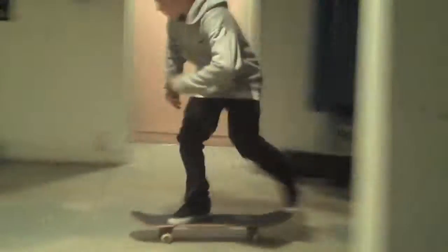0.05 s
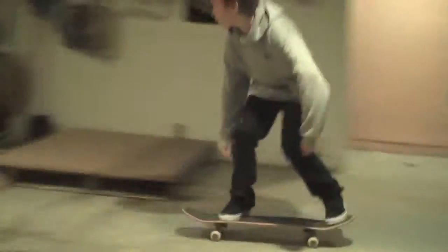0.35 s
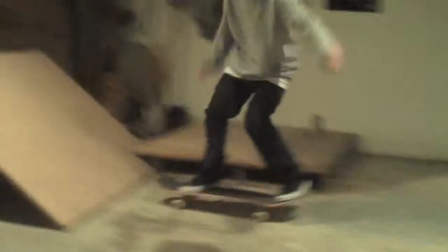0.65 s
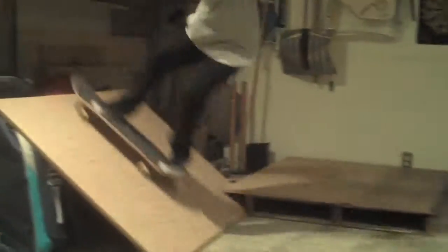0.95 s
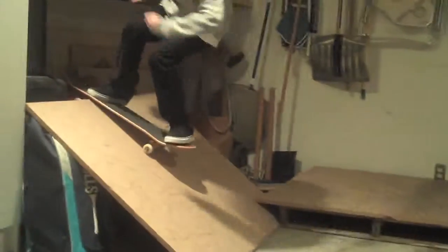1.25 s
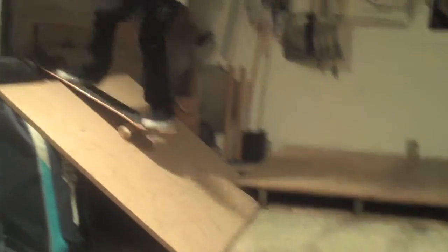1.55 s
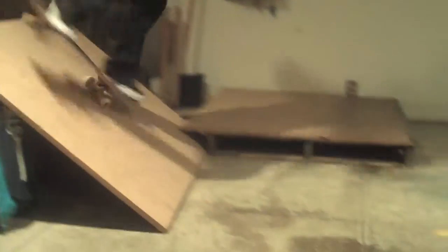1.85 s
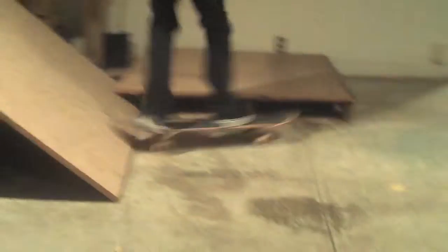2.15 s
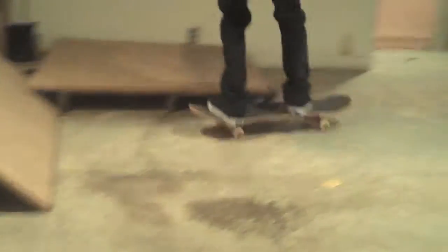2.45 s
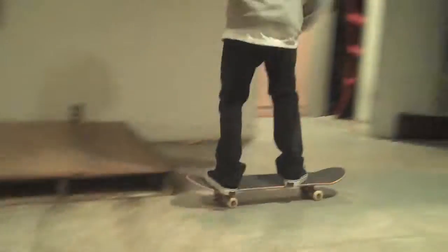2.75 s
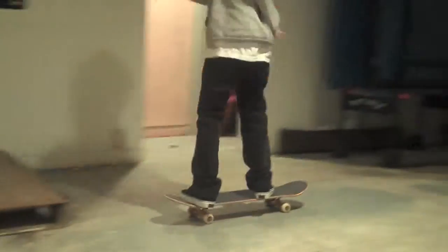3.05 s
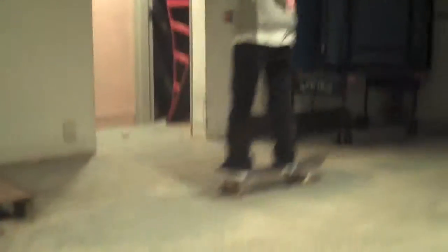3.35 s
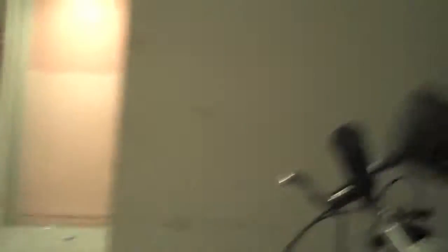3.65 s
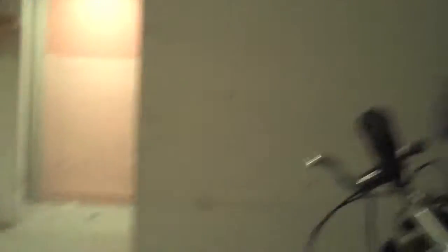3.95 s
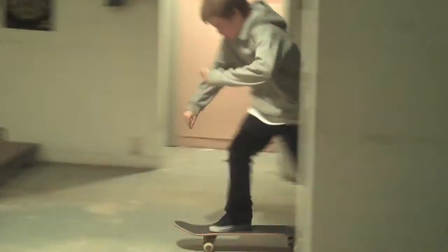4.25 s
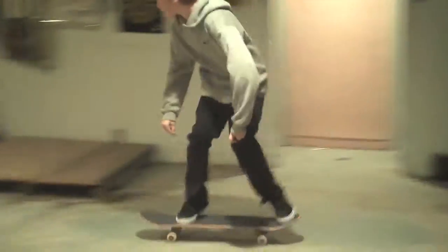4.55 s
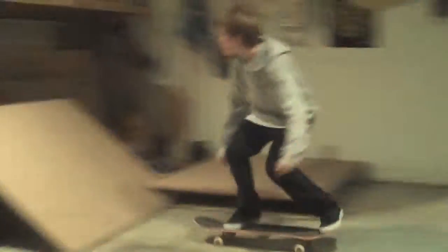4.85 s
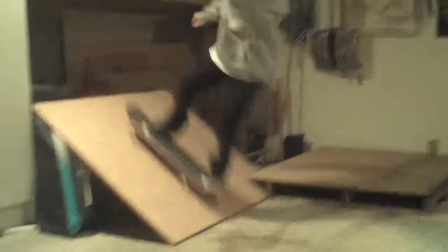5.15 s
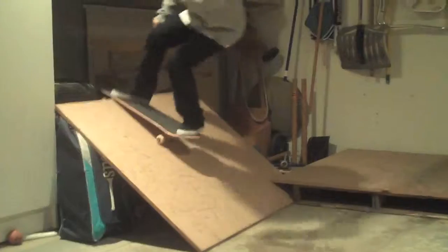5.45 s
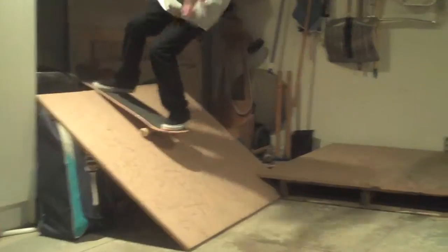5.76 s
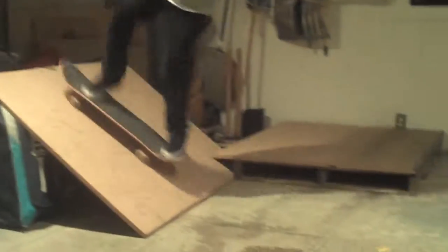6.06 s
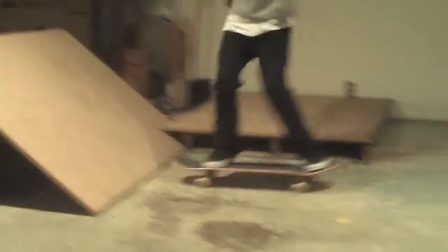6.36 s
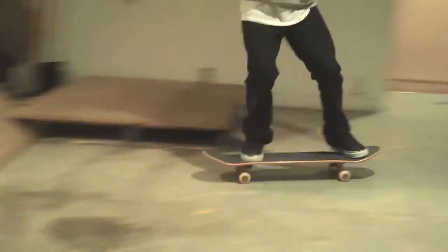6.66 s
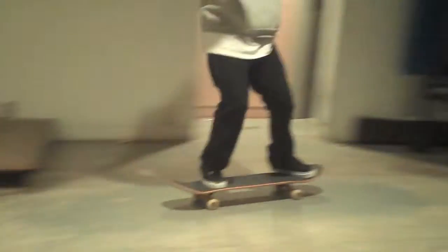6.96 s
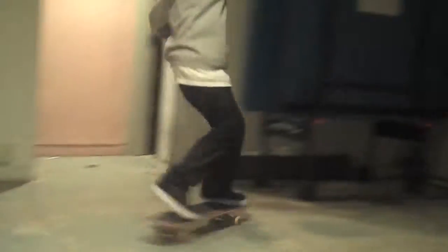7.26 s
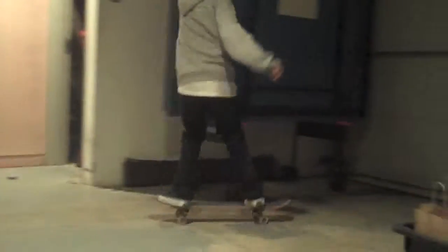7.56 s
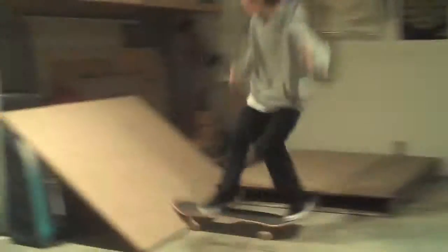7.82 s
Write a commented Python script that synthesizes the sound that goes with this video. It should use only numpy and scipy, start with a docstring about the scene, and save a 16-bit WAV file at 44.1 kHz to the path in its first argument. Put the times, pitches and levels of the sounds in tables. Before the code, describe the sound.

A skateboard rolls over gritty concrete and clatters up and down a wooden ramp, with sharp knocks echoing in a garage.

```python
"""Skateboard on a garage ramp

A bare concrete garage, one small microphone in a fixed spot. A skater rolls up a plywood ramp, stalls,
drops back and coasts away, does it again and starts a third run. Hard wheels roar on the gritty floor;
each blow rings the ramp, the deck and the metal trucks. Knocks are drier close by and roomier far off.
The garage rings on after each one, and the loudest overload the microphone."""
import sys
import numpy as np
from scipy import signal
from scipy.io import wavfile
from scipy.ndimage import uniform_filter1d

SR = 44100
rng = np.random.default_rng(int(sys.argv[2]) if len(sys.argv) > 2 else 0)


def output_pcm(signal):
    """Save a mono or channel-first signal as 16-bit PCM at the path in sys.argv[1].

    Samples are clipped to [-1, 1] before scaling.
    """
    pcm = np.clip(np.atleast_2d(signal).T, -1, 1) * 32767
    wavfile.write(sys.argv[1], SR, np.round(pcm).astype(np.int16))


N = 356769
FFT_SIZE = 8192
HZ, TIME = np.fft.rfftfreq(FFT_SIZE, 1 / SR), np.arange(N) / SR


def amp(db):
    """Decibels to gain."""
    return 10 ** (np.asarray(db) / 20)


def unit_rms(x):
    """Scales to rms 1."""
    return x / np.sqrt(np.mean(x ** 2) + 1e-20)


def curve_at(points, hz):
    """Reads a table on a log-frequency axis."""
    freqs, values = np.transpose(points)
    return np.interp(np.log(hz + 1), np.log(freqs + 1), values)


def since(start_s):
    """Seconds gone by after a moment, zero before it."""
    return np.maximum(TIME - start_s, 0)


def add(mix, start_s, sound):
    """Mixes a sound in at a time."""
    part = mix[max(round(start_s * SR), 0):][:len(sound)]
    part += sound[:len(part)]


def body(spectrum, modes=()):
    """Frequency response of unit power: a broad spectrum with resonance peaks on it."""
    peaks = sum((amp(db) ** 2 - 1) / (1 + (2 * (HZ - hz) / width) ** 2) for hz, width, db in modes)
    return unit_rms(amp(curve_at(spectrum, HZ)) * np.sqrt(np.maximum(1 + peaks, .1)))


def ring(x, response):
    """Passes x through the minimum-phase filter that has this response."""
    log_gain = np.log(np.maximum(response, 1e-5))
    mirrored = np.concatenate([log_gain, log_gain[-2:0:-1]])
    impulse = np.fft.ifft(np.exp(np.conj(signal.hilbert(mirrored)))).real
    return signal.oaconvolve(x, impulse[:FFT_SIZE // 2])[:len(x)]


def floor_grain(per_s, spread_db, wet_db=2, echo_s=0.049):
    """Random clicks of a wheel on rough concrete, a few much larger, and their wash in the room."""
    sizes = amp(spread_db * np.minimum(rng.exponential(1, N), 5))
    clicks = sizes * rng.choice([-1, 1], N) * (rng.random(N) < per_s / SR)
    room_energy = signal.lfilter([1], [1, -np.exp(-1 / (echo_s * SR))], clicks ** 2)
    wash = np.sqrt(room_energy) * rng.standard_normal(N)
    return unit_rms(clicks) + amp(wet_db) * unit_rms(wash)


def standing_waves(x, depth_db=3.5, frames=12, bins=3):
    """Narrow peaks come and go as the board moves through the standing waves of the room."""
    spectra = signal.stft(x, nperseg=2048, noverlap=1536)[2]
    drift = uniform_filter1d(rng.standard_normal(spectra.shape), frames, axis=1)
    patches = unit_rms(uniform_filter1d(drift, bins, axis=0))
    return unit_rms(signal.istft(spectra * amp(depth_db * patches), nperseg=2048, noverlap=1536)[1][:N])


def stretch(start_s, end_s, level_db, tone_db, change_db=0, rise_s=0.063, release_s=0.061):
    """Gains of rumble, roar and grit over one part of a ride: rise, hold, die away in the room."""
    envelope = np.minimum(since(start_s) / rise_s, 1) * np.exp(-since(end_s) / release_s)
    return envelope * amp(level_db + np.array(tone_db)[:, None] + change_db)


def run_up(start_s, ramp_s, floor_db, ramp_db, rumble_db, settle_s=.22, approach_s=0.15):
    """The wheels settle, grow louder towards the ramp, then slow to a stall on the smooth plywood."""
    # wheel tone on floor and ramp, swells at set-down and near the ramp: rumble_db, roar_db, grit_db
    cruise_db = [-15, -2.5, -11]
    climb_db = [-12, -5, -24]
    set_down_db = [-9.5, 6, 2]
    approach_db = [14, 10, 11.5]
    climb_s, stall_s, speed_power = 0.95, .85, 2.39
    creep = 0.25  # share of its speed the board keeps while the rider balances at the top
    settling = np.exp(-(since(start_s) / settle_s) ** 2)
    closeness = np.exp(-(np.maximum(ramp_s - TIME, 0) / approach_s) ** 2)
    swell_db = np.outer(set_down_db, settling) + np.outer(approach_db, closeness)
    swell_db[0] += rumble_db
    speed = np.maximum(1 - since(ramp_s) / climb_s, creep)  # gravity slows the board
    return [stretch(start_s, ramp_s, floor_db, cruise_db, swell_db),
            stretch(ramp_s, ramp_s + stall_s, ramp_db, climb_db) * speed ** speed_power]


def roll_back(start_s, floor_s, end_s, ramp_db, floor_db, rumble_db, grit_db, jolt_s=0.29):
    """The board rolls quietly down, lands with a jolt and coasts away."""
    # wheel tone on ramp and floor, and the swell while the board shakes: rumble_db, roar_db, grit_db
    descent_db = [-7.5, -3.5, -8]
    coast_db = [-9.5, -3, -7.5]
    jolt_db = [23.5, 28, 4]
    colour_db = np.array([[rumble_db], [0], [grit_db]])
    shake_db = np.outer(jolt_db, np.exp(-since(floor_s) / jolt_s))
    return [stretch(start_s, floor_s, ramp_db, descent_db, colour_db),
            stretch(floor_s, end_s, floor_db, coast_db, colour_db + shake_db)]


def turn(start_s, end_s, rise_s, level_db):
    """Wheels dragged sideways hiss with grit and fade as the turn slows."""
    # tone of the scrape: rumble_db, roar_db, grit_db
    scrape_db = [-23, -1, 1.5]
    # its fade: rumble_db_per_s, roar_db_per_s, grit_db_per_s
    fade_rates = [10, 26.5, 14.5]
    return [stretch(start_s, end_s, level_db, scrape_db, -np.outer(fade_rates, since(start_s)), rise_s)]


def rolling(spin_hz=17, throb_db=0.1):
    """Floor grain shakes deck and wheels; slightly uneven wheels throb as they turn."""
    # across the floor and up the ramp: start_s, ramp_s, floor_db, ramp_db, rumble_db
    run_ups = [(0.0, 0.795, -33, -18.5, 2), (4.255, 5.06, -28.5, -24.5, -2.5), (7.77, 7.859, -42, -19, 6)]
    # back down and away: start_s, floor_s, end_s, ramp_db, floor_db, rumble_db, grit_db
    roll_backs = [(1.65, 2.058, 3.45, -41, -45.5, -0.5, -0.5), (5.803, 6.197, 7.25, -41, -42.5, 1.5, -1)]
    # sideways scrapes: start_s, end_s, rise_s, level_db
    turns = [(1.672, 2.05, 0.034, -47.5), (3.602, 3.8, .05, -54.5), (3.794, 4.204, 0.019, -24),
             (7.244, 7.81, 0.16, -30.5)]
    # low, middle and high layers of the wheel noise: freq_hz, level_db
    rumble_spectrum = [(30, -55), (70, -37), (95, -16), (130, 1), (190, 3), (240, 5), (300, -0.5), (450, 9),
                       (1500, -59.5)]
    roar_spectrum = [(60, -57), (220, -22), (350, -1.5), (600, 2), (800, 2.5), (1050, -1.5), (1650, -6),
                     (1980, -9.5), (2250, -14.5), (2900, -22.5), (6000, -53), (14000, -75)]
    grit_spectrum = [(200, -57), (900, 6), (1500, 11), (2050, 8), (2450, 4.5), (2950, 0.5), (4000, -2.5),
                     (5300, -5.5), (6000, -8.5), (7200, -13), (9600, -16.5), (13500, -28.5)]
    # resonances of the room and of the wheels: pitch_hz, width_hz, boost_db
    room_modes = [(137, 11, 0.5), (187, 13, 8.5), (238.4, 18, 12), (288, 37, 8)]
    wheel_modes = [(326, 25, 2), (384, 32, 1.05), (581, 49, 6.1), (688, 28, 5.4), (794, 49, 5.6),
                   (1370, 110, 0.91), (1600, 82, 3), (1890, 160, 2.2)]
    moves = [(run_up, run_ups), (roll_back, roll_backs), (turn, turns)]
    power = sum(gains ** 2 for move, rows in moves for row in rows for gains in move(*row))
    rumble_gain, roar_gain, grit_gain = np.sqrt(power)
    throb_rates_hz = spin_hz * rng.uniform(0.26, 2.7, 12)
    throb = unit_rms(sum(np.sin(2 * np.pi * (hz * TIME + rng.random())) for hz in throb_rates_hz))
    rumble = unit_rms(ring(floor_grain(per_s=1500, spread_db=8), body(rumble_spectrum, room_modes)))
    roar = standing_waves(ring(floor_grain(per_s=2000, spread_db=2), body(roar_spectrum, wheel_modes)))
    grit = unit_rms(ring(floor_grain(per_s=2000, spread_db=2.5), body(grit_spectrum)))
    return (rumble_gain * rumble + roar_gain * roar + grit_gain * grit) * amp(throb_db * throb)


def strikes():
    """Start, part levels and chatter of each blow: hard ones ring the trucks and tick, heavy ones thud."""
    # blows on the board: start_s, level_db, hardness_db, weight_db, chatter_s
    cracks = [(0.052, -29, -5, -11, 0.092), (0.363, -36.5, 0, 2, .015), (0.552, -38, -13, 15, 0.0035),
              (2.537, -34, 3.5, -8, 0.026), (2.727, -41, 4.5, 3, 0.0088), (2.920, -40.5, 2, 5, 0.012),
              (3.268, -39, 5, 4, 0.012), (6.545, -31, -3, 6, .015)]  # wheels tick over cracks in the floor
    landings = [(0.798, -23, 9.5, -6, 0.061), (0.874, -11, -25.5, -1, 0.0052), (2.060, -7, 5, 5.5, 0.013),
                (2.150, -13.5, -5.5, -8, 0.063), (4.957, -24.5, 4, -11, 0.038),
                (6.056, -13.5, -1.5, 2.5, 0.015), (6.302, -16, 5, -13, 0.022)]  # the rider's weight comes down at the foot of the ramp
    clacks = [(0.835, -13, 1.5, -11, 0.017), (3.396, -26.5, -1.5, 13, 0.0015),
              (3.432, -36.5, 6, -4.5, 0.012), (5.022, -11.5, 3, 3, 0.011), (5.097, -12, 0.5, 1, 0.0092),
              (6.192, -15.5, 3, 8, 0.0079), (7.859, -12, 0, 2.5, 0.04), (7.935, -11.5, -1, 0, 0.0093)]  # trucks clack as the wheels hit the ramp's lip or the floor
    booms = [(1.090, -26.5, 12, -8, 0.0075), (1.122, -19.5, -4, -2, 0.018), (5.138, -13, 1, -4, 0.0057),
             (5.445, -30.5, -0.5, 9, 0.043), (8.056, -20, -22, 16, 0.018)]  # the plywood booms under the load
    shifts = [(1.550, -50, 0.5, -8, 0.0062), (1.660, -44, 7, -8, 0.039), (1.692, -37, 1, 8, 0.039),
              (2.012, -28.5, -2.5, -5, .081), (5.831, -39.5, -2.5, -1, .018), (5.879, -38, -1.5, -10, .013),
              (7.818, -36, 7, -12, .035)]  # trucks knock as the rider shifts weight
    slaps = [(4.204, -13.5, 8, 9, 0.016), (4.235, -9.5, -2.5, -14, 0.016), (4.272, -14, -11, -7, .01)]  # the board slaps onto concrete after a turn
    # share of hardness and of weight that reaches each part: thud, ramp, deck, truck, tick
    hard_shares = np.array([0.034, 0.062, 0.098, 0.62, 1.0])
    heavy_shares = np.array([1.0, 0.16, 0, 0.12, 0.19])

    def shake(rows, parts_db):
        """One kind of blow; parts_db is thud_db, ramp_db, deck_db, truck_db, tick_db."""
        return [(start_s, level_db + hard_db * hard_shares + heavy_db * heavy_shares + parts_db, chatter_s)
                for start_s, level_db, hard_db, heavy_db, chatter_s in rows]

    return (shake(clacks, (-34, -4.5, -9.5, 0, -16))
            + shake(landings, (-27, -3, -0.5, -6.5, -19.5))
            + shake(slaps, (-32, -12.5, 1, -7, -20))
            + shake(booms, (-23, 1, -20.5, -9, -33))
            + shake(cracks, (-43, -5.5, -2, -9.5, -17))
            + shake(shifts, (-24, 1.5, -7.5, -2.5, -11)))


def rattle(t, chatter_s, early_s=0.011, attack_share=0.1, spiky_db=2.5, clack_s=0.00088):
    """Loose hardware chatters in uneven clacks; a longer chatter starts more softly."""
    clacks = unit_rms(uniform_filter1d(rng.standard_normal(len(t)), int(clack_s * SR)))
    envelope = np.exp(-t / (early_s + chatter_s)) * (1 - np.exp(-t / (attack_share * chatter_s)))
    return unit_rms(rng.standard_normal(len(t)) * amp(spiky_db * np.clip(clacks, -2, 2)) * envelope)


def wall_echoes():
    """One second of dense echoes off bare walls, each band dying at its own speed."""
    # reverberation of the garage: freq_hz, t60_s
    decay_times = [(60, 0.17), (130, 0.32), (250, 0.57), (800, 0.59), (2200, 0.57), (5500, 0.75),
                   (9000, 0.45), (14000, 0.21)]
    hz, t, spectra = signal.stft(rng.standard_normal(SR), SR, nperseg=256)
    decay = amp(-60 * t / curve_at(decay_times, hz)[:, None])
    return signal.istft(spectra * decay, SR, nperseg=256)[1][:SR]


def blows(build_s=0.0032, energy_s=0.025, click_db=-13, soften_s=0.025, shelf_hz=7500):
    """Each blow is a contact click, a rattle and the room's tail, coloured by the parts it shakes."""
    # what each part radiates: freq_hz, level_db
    thud = [(15, -24), (35, -10), (70, -5), (110, 1.5), (170, 5), (500, -51.5), (3000, -81)]
    ramp = [(30, -48), (60, -52), (105, -22.5), (150, -19.5), (200, -3.5), (400, 1.5), (620, 2.5),
            (1000, -2.5), (2000, -8), (4000, -36.5), (12000, -44)]
    deck = [(30, -43), (130, -40.5), (300, -35), (500, -3.5), (720, 3), (1050, -1), (1400, -0.5),
            (2000, -12), (4000, -52.5), (12000, -62)]
    truck = [(30, -23), (300, -40), (900, -5.5), (1700, -4), (2300, -4), (3100, -7.5), (4500, -22.5),
             (7000, -37.5), (14000, -89)]
    tick = [(30, -37), (1500, -29), (3500, 4.5), (5300, -1), (7000, -7), (9500, -12), (14000, -28.5)]
    # resonances of the wood and metal: pitch_hz, width_hz, boost_db
    ramp_modes = [(178, 33, 6.9), (242, 24, 3.3), (335, 51, 3.8), (388.6, 10.2, 9), (490.4, 8.6, 9.8),
                  (552, 18, 3.8), (608.6, 6.4, 12.2), (844, 6.6, 6.6), (1020, 13, 8.2)]
    deck_modes = [(579, 12, 3.1), (684, 8.1, 8.8), (784, 34, 6.9), (820, 12, 2.2), (930, 36, 5.2),
                  (1338, 37, 4.2), (1446, 56, 5)]
    truck_modes = [(1670, 99, 5.4), (1872, 39, 7.5), (1990, 14, 3.9), (2060, 23, 5.6), (2246, 40, 5.1),
                   (2365, 40, 3.1), (2530, 26, 2.4), (2610, 30, 2.5), (2820, 21, 4.7), (3550, 230, 2.2)]
    # room against direct sound: thud_db, ramp_db, deck_db, truck_db, tick_db
    wet_db = [-16.5, 1, -2.5, -6.5, -7.5]
    # the board's distance, dry and bright near the microphone: time_s, room_db, treble_db
    distance = [(0.85, 0, 1), (1.15, 2.5, -5.5), (2.06, -1.5, 3.5), (3.4, 8, -6), (4.25, -3.5, 8.5),
                (5.05, -1.5, -6), (6.15, 2.5, 0.5), (7.9, -5.5, -5)]
    times_s, room_db, treble_db = np.transpose(distance)
    parts = [body(thud), body(ramp, ramp_modes), body(deck, deck_modes),
             body(truck, truck_modes), body(tick)]
    power_spectra = np.array(parts) ** 2
    t, out = np.arange(SR) / SR, np.zeros(N)
    for start_s, parts_db, chatter_s in strikes():
        click = amp(click_db) * np.exp(-chatter_s / soften_s) * unit_rms(1. * (t == 0))
        contact = unit_rms(rattle(t, chatter_s) + click)
        filling = 1 - np.exp(-t / (build_s + chatter_s))  # the room fills while the chatter lasts
        tail = unit_rms(wall_echoes() * filling)
        energy = amp(parts_db) ** 2 * energy_s
        wet_share = 1 / (1 + amp(np.add(wet_db, np.interp(start_s, times_s, room_db))) ** -2)
        shelf = amp(np.interp(start_s, times_s, treble_db) / (1 + (shelf_hz / (HZ + 1)) ** 4))
        direct = ring(contact, shelf * np.sqrt(energy * (1 - wet_share) @ power_spectra))
        room = ring(tail, shelf * np.sqrt(energy * wet_share @ power_spectra))
        add(out, start_s, direct + room)
    return out


def brief_tones(unsteady=0.58):
    """Single noise-driven resonances swell and die, unsteady in pitch and strength."""
    # short tones and hisses, rings near 700 Hz just after the board lands, a bright snap on one clack:
    # peak_s, pitch_hz, width_hz, level_db, half_length_s
    tones = [ (0.154, 706, 50, -33.5, 0.059), (0.723, 611, 22.4, -22.5, 0.024),
             (1.594, 3830, 960, -57, 0.031), (1.673, 2360, 250, -48, 0.017),
             (1.912, 3860, 2020, -48.5, 0.13), (2.038, 3380, 244, -43, 0.022),
             (2.183, 735, 28, -20.5, 0.074), (3.398, 4840, 900, -31.5, 0.0015),
             (3.843, 784, 34.3, -18.5, 0.012), (4.29, 695, 60, -13.5, 0.012),
             (6.239, 650, 30.4, -15.5, 0.022), ]
    out, t = np.zeros(N), np.arange(SR) / SR - .5
    for peak_s, pitch_hz, width_hz, level_db, half_length_s in tones:
        pole = np.exp(-np.pi * width_hz / SR)
        noise = rng.standard_normal(SR) + 1j * rng.standard_normal(SR)
        drive = signal.lfilter([1], [1, -2 * pole, pole * pole], noise)
        tone = (drive / abs(drive) ** (1 - unsteady) * np.exp(2j * np.pi * pitch_hz * t)).real
        swell = amp(level_db) / np.cosh(np.clip(1.3 * t / half_length_s, -30, 30))
        before_start = max(round((.5 - peak_s) * SR), 0)
        add(out, peak_s - .5, (unit_rms(tone) * swell)[before_start:])
    return out


def scene():
    """Rolling, brief tones and blows, heard from one spot in the garage."""
    return (rolling() + brief_tones() + blows())[None]


def record(dry, limit_db=-10, squeeze=0.11, recover_db_per_s=70, ceiling=.75, lopsided=.12):
    """A small microphone: gain control, overload with a low bump, faint hiss, dips and a band limit."""
    # hiss of the quiet garage: freq_hz, level_db
    hiss_spectrum = [(20, -6), (60, -16), (120, -16), (300, -14.5), (1500, -18), (4000, -18), (14000, -42)]
    # the level dips briefly to nothing: time_s, fall_s, rise_s
    dips = [(0.028, 0.0039, 0.046), (3.54, 0.091, 0.45), (7.808, 0.083, .04), (8.042, 0.055, 0.2)]
    hiss_db, top_hz = -66, 14100
    power = signal.lfilter([1 / 200], [1, 1 / 200 - 1], dry[0] ** 2)  # smoothed over 200 samples
    recovery_db = TIME * recover_db_per_s
    held_db = np.maximum.accumulate(10 * np.log10(power + 1e-12) + recovery_db) - recovery_db
    ducked = dry[0] / amp(squeeze * np.maximum(held_db - limit_db, 0))
    clipped = ducked / (1 + (ducked / ceiling) ** 6) ** (1 / 6)
    # overload is lopsided: what is cut off pushes the signal one way
    bump_band = signal.butter(2, [20, 110], "band", fs=SR, output="sos")
    bump = lopsided * signal.sosfilt(bump_band, abs(ducked - clipped))
    mix = clipped + bump + amp(hiss_db) * ring(rng.standard_normal(N), body(hiss_spectrum))
    for time_s, fall_s, rise_s in dips:
        mix *= np.clip(np.maximum((time_s - TIME) / fall_s, (TIME - time_s) / rise_s), 0, 1)
    lowpass = signal.firwin(255, top_hz, window=("kaiser", 8), fs=SR)
    return signal.oaconvolve(mix, lowpass, "same")[None]


dry = scene()
out = record(dry)
output_pcm(out)
```